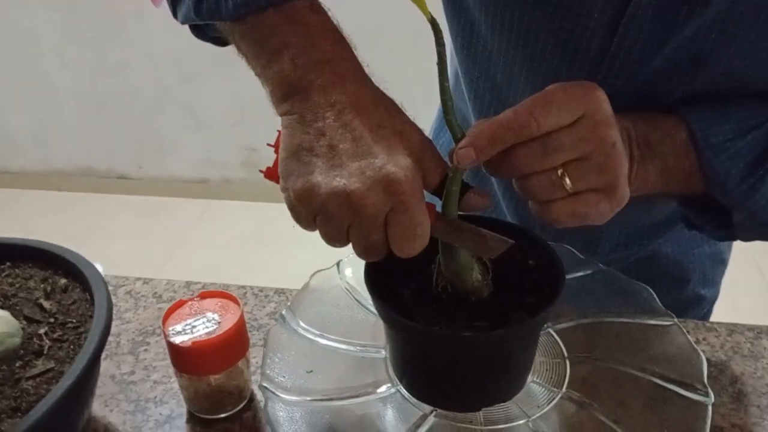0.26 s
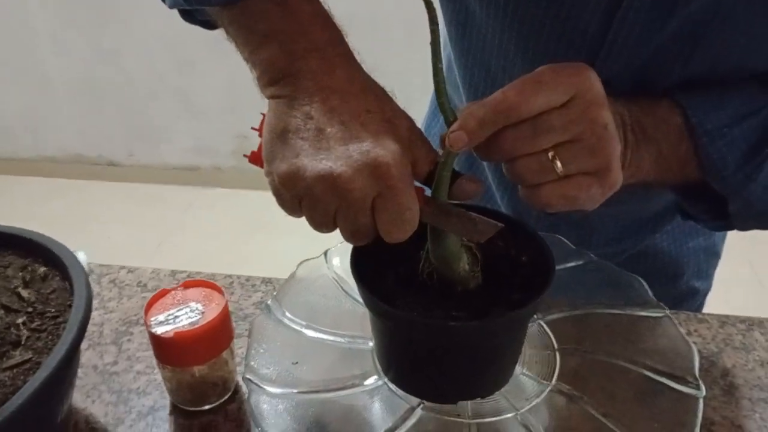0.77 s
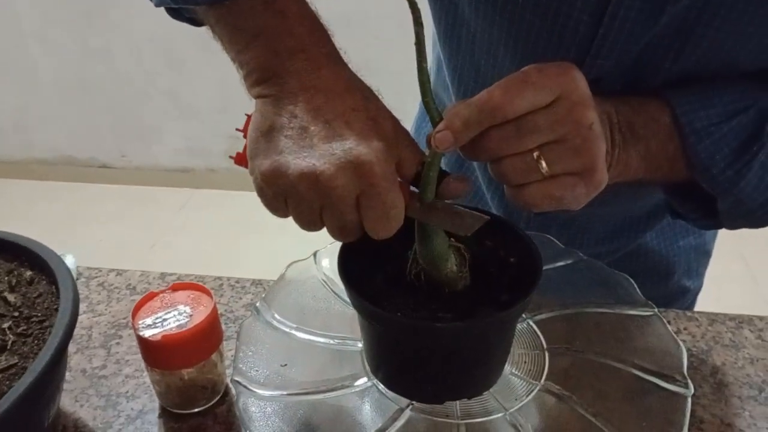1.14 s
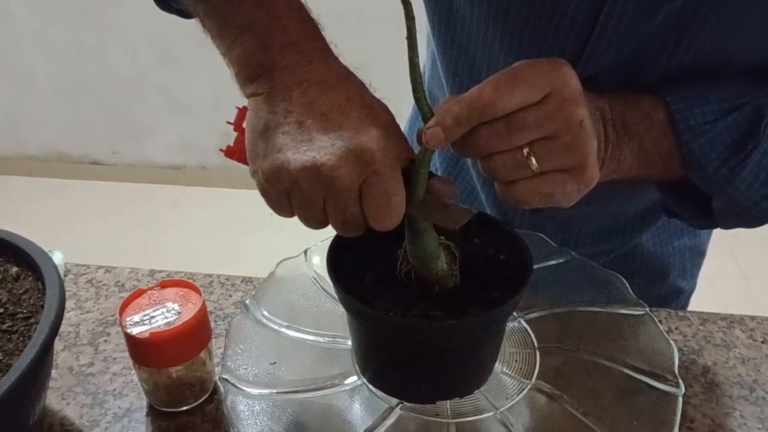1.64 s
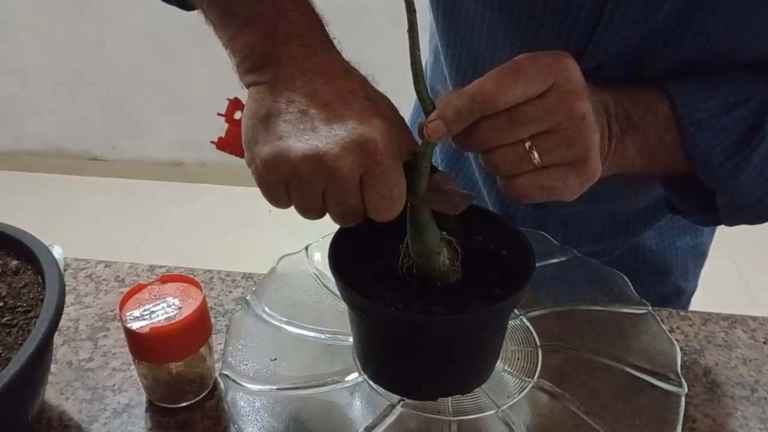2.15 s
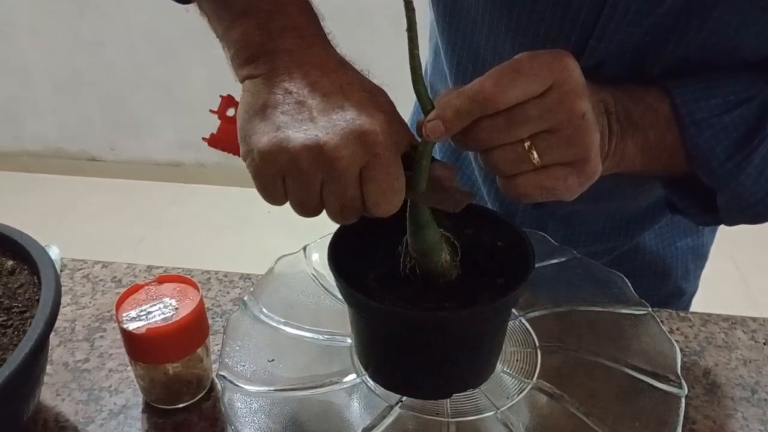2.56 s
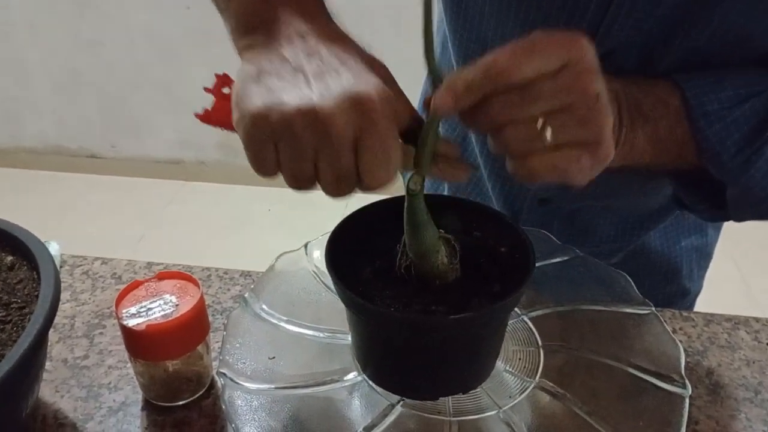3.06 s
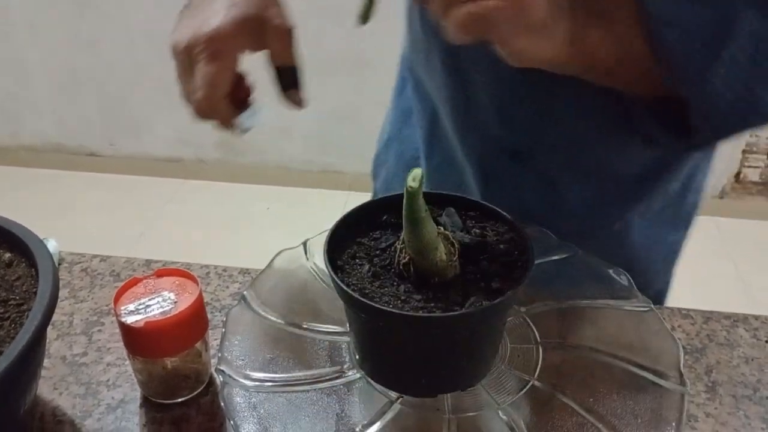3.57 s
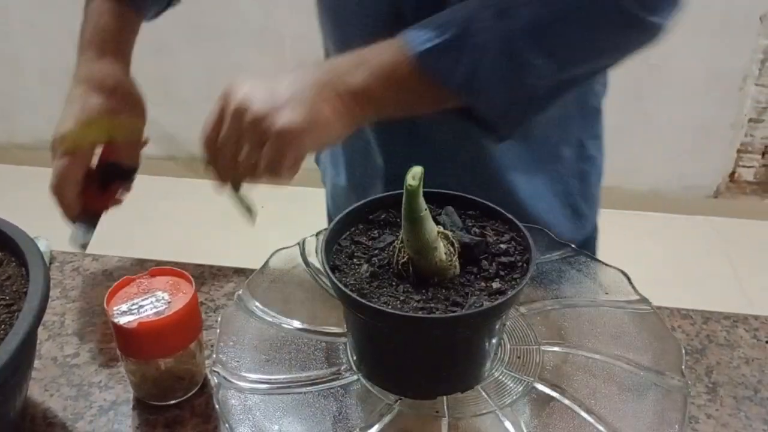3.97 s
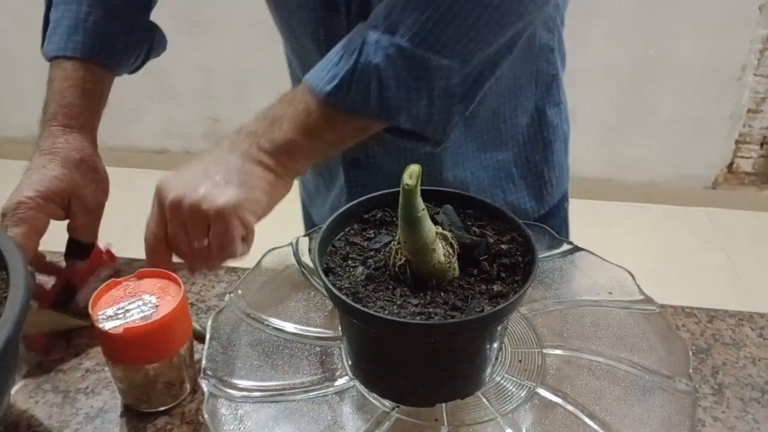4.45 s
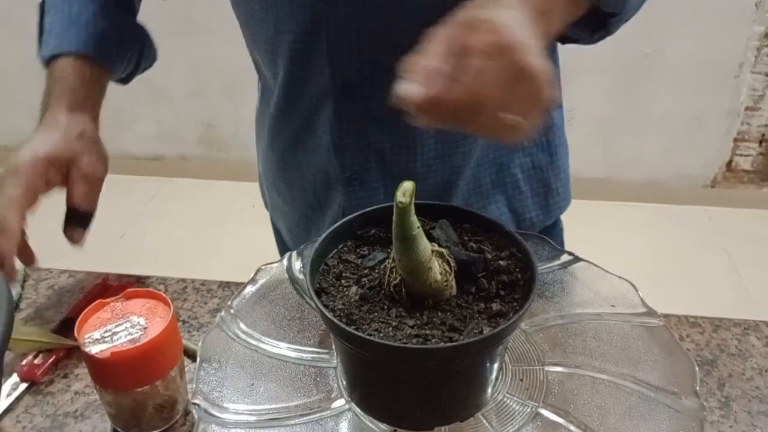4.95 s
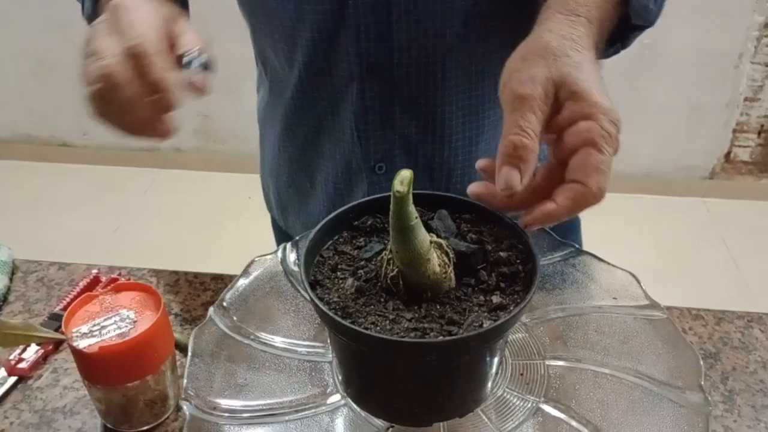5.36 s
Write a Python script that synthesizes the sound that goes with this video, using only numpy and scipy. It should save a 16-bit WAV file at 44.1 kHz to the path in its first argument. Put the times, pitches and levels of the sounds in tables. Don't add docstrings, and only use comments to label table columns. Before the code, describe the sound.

Close, sparse, dry clicks and short tears of a plant stem being cut, with faint squeaks and skin rubs, over low hum and soft hiss. Near three seconds the pot rocks with a soft low thud. Sleeves rustle, then a knife drops on stone in a fast, loud, metallic clatter with a rattling blade. The hard porch echoes briefly; small clicks and rubbing follow. Phone-like close pickup.

```python
import sys
import numpy as np
from scipy import signal
from scipy.fft import rfft, irfft, next_fast_len
from scipy.io import wavfile
from scipy.ndimage import uniform_filter1d, map_coordinates

SR = 44100
rng = np.random.default_rng(int(sys.argv[2]) if len(sys.argv) > 2 else 0)


def dump(signal):
    limited = np.clip(np.atleast_2d(signal).T, -1, 1)
    pcm = np.round(limited * 32767).astype(np.int16)
    wavfile.write(sys.argv[1], SR, pcm)


def amplitude_ratio(level_db):
    exponent = np.asarray(level_db, float) / 20
    return 10 ** exponent


N = 247576
TIME_S = np.arange(N) / SR


def unit(x):
    return x / np.sqrt(np.mean(x ** 2) + 1e-20)


def along(points, hz):
    f, v = np.transpose(points)
    return np.interp(np.log(hz + 1), np.log(f + 1), v)


def filtered(x, response):
    m = next_fast_len(len(x) + 8192)
    return irfft(rfft(x, m) * response(np.fft.rfftfreq(m, 1 / SR)), m)[:len(x)]


def coloured(x, spectrum):
    return filtered(x, lambda hz: amplitude_ratio(along(spectrum, hz)))


def modes(rows):
    def response(f):
        total = 0
        for k, (centre, width, db) in enumerate(rows):
            resonance = 1j * f * width / (centre * centre - f * f + 1j * f * width)
            total = total + (-1) ** k * amplitude_ratio(db) * resonance
        return total
    return response


def noise(spectrum, patchy_db):
    z = signal.stft(rng.standard_normal(N + 512), nperseg=512)[2]
    field = uniform_filter1d(rng.standard_normal(z.shape), size=6, axis=0)
    field = uniform_filter1d(field, size=10, axis=1)
    x = signal.istft(z * amplitude_ratio(patchy_db * unit(field)), nperseg=512)[1][:N]
    return unit(coloured(x, spectrum))


def wander(rate_hz, count):
    return map_coordinates(rng.standard_normal(count), [TIME_S * rate_hz])


def swells(rows):
    total = 0
    for start_s, length_s, *db in rows:
        arch = np.sin(np.pi * np.clip((TIME_S - start_s) / length_s, 0, 1))
        total = total + amplitude_ratio(np.array(db))[:, None] * arch
    return total


def contacts(rows, colour, body, sharp, hold, broad_db, knock_db):
    out, t = np.zeros(N + SR), np.arange(SR // 8) / SR
    for start_s, db, low_db, hz, rise_s, length_s in rows:
        push = amplitude_ratio(-60 * (t / length_s) ** hold) * (1 - np.exp(-t / rise_s))
        burst = push * rng.standard_normal(len(t))
        peak = filtered(burst, modes([(hz, hz / sharp, 0)]))
        broad = filtered(burst, lambda f: modes(colour)(f) / (1 + 1j * f / (1.95 * hz)) ** 2)
        bright = peak + amplitude_ratio(broad_db) * broad
        knock = filtered(burst + 2.0 * push ** 6, modes(body))
        bright = bright / np.abs(bright).max()
        knock = knock / np.abs(knock).max()
        out[round(start_s * SR):][:len(t)] += amplitude_ratio(db) * (bright + amplitude_ratio(low_db + knock_db) * knock)
    return out[:N]


# time in seconds, shaft speed in Hz, level in dB.
ENGINE_SPEED = [(0, 47.97, -70.5), (.7, 48.08, -69), (1.2, 45.86, -67), (2.05, 50.4, -66),
                (2.3, 46.36, -63), (2.9, 47.28, -59.5), (3.4, 47.33, -67.5), (3.85, 48.1, -63.5),
                (4.2, 49.6, -59.5), (4.55, 51.6, -65), (5, 50.04, -75), (5.2, 45.1, -81.5),
                (5.6, 43.7, -57)]
# multiple of shaft speed, level in dB.
SHAFT_ORDERS = [(2, -6.5), (3, -3), (4, 2.5), (5, -2.5), (6, -12.5)]


def engine():
    s, shaft_hz, level_db = np.transpose(ENGINE_SPEED)
    turns = np.cumsum(np.interp(TIME_S, s, shaft_hz)) / SR
    total = 0
    for order, db in SHAFT_ORDERS:
        waver = amplitude_ratio(2.1 * wander(6, 64))
        total = total + amplitude_ratio(db) * waver * np.sin(2 * np.pi * round(order) * turns)
    return amplitude_ratio(np.interp(TIME_S, s, level_db) - 0.5) * total


# frequency in Hz, density in dB per Hz.
AIR_SPECTRUM = [(20, -49), (40, -38), (52, -26), (75, -9.5), (102, -3.5), (185, -6.5), (394, -15.5),
                (641, -17.5), (988, -21.5), (1480, -25), (2400, -26), (3200, -32.5), (5880, -33),
                (16000, -34.5)]
# start in seconds, length in seconds, level in dB.
TRUCK_PASSES = [
    (.2, 0.97, -77),
    (2.2, .3, -67),
    (2.8, 0.26, -64),
    (4.7, 0.78, -62.5),
]


def outdoors():
    air_db, mains_db, mains_hz = -58, -71.5, 60
    beat_hz, beat_at_s, beat_share = 0.86, 1.25, 0.54

    def hum(hz, width_hz):
        return unit(filtered(rng.standard_normal(N), lambda f: modes([(hz, width_hz, 0)])(f) ** 2))

    air = amplitude_ratio(air_db - 0.5) * noise(AIR_SPECTRUM, patchy_db=1.22)
    beat = 1 + beat_share * np.cos(2 * np.pi * beat_hz * (TIME_S - beat_at_s))
    mains = beat * (np.sin(2 * np.pi * mains_hz * TIME_S) + 0.3 * hum(61, 6.9))
    traffic = (amplitude_ratio(-71) + swells(TRUCK_PASSES)[0]) * hum(123.0, 59.4)
    return air + amplitude_ratio(mains_db) * mains + traffic + engine()


# start in seconds, peak in dB, pitch in Hz, length in seconds.
SQUEAK_EVENTS = [(1.282, -62, 3880, 0.062), (1.248, -54, 7900, .015), (2.785, -61, 10800, 0.067),
                 (3.068, -55.5, 4690, 0.015), (3.092, -61, 7570, .045), (3.615, -61, 4550, 0.046),
                 (4.087, -47, 4500, 0.01), (5.065, -57, 13760, .015), (5.399, -60, 5170, .041),
                 (5.42, -51.5, 4860, 0.054), (5.42, -57.5, 6770, .046)]


def squeaks():
    rise_share, waver_rad = 0.15, 1
    out, t = np.zeros(N + SR), np.arange(SR // 8) / SR
    for start_s, db, hz, length_s in SQUEAK_EVENTS:
        shape = amplitude_ratio(-60 * (t / length_s) ** 2.04) * (1 - np.exp(-t / (rise_share * length_s)))
        waver = waver_rad * map_coordinates(rng.standard_normal(128), [t * 600])
        out[round(start_s * SR):][:len(t)] += amplitude_ratio(db) * shape * np.sin(2 * np.pi * hz * t + waver)
    return out[:N]


# start in seconds, peak in dB, stem knock in dB, bright pitch in Hz.
FIBRE_SNAPS = [(0.541, -44.5, -22, 4350), (0.571, -62.5, -5.5, 10400), (0.643, -63, -8, 5270),
               (0.6897, -34, -35, 10000), (0.8129, -52.5, -19, 6600), (0.886, -30, -18.5, 11730),
               (0.8865, -37, -40, 6500), (1.1488, -53, -18, 10700), (1.2254, -51, -17, 4800),
               (1.3075, -50, -20, 9780), (1.481, -56, -25, 6600), (1.6104, -33.5, -44, 9350),
               (1.6106, -37, -48, 4800), (2.628, -55, -24, 7900), (2.8484, -59, -16, 10800),
               (2.859, -32.5, -31, 11000), (3.246, -54, -31, 5254), (3.492, -47, -25, 8500),
               (4.1973, -46, -26, 9700), (4.374, -52, -18, 9000), (4.926, -49, -23, 7640),
               (5.265, -55, -27, 4700), (5.552, -56, -18.5, 4800)]
# start in seconds, peak in dB, stem knock in dB,
# bright pitch in Hz, length in seconds.
FIBRE_TEARS = [(1.028, -34.5, -18.5, 9000, 0.0088), (1.232, -49, -32, 7900, .015),
               (1.613, -41, -24, 11000, 0.013), (1.656, -44, -19.5, 9700, 0.013),
               (1.728, -52, -22, 11000, .028), (1.839, -46.5, -22, 10900, 0.013),
               (2.0555, -47.5, -32, 9000, 0.01), (2.185, -49.5, -27, 10920, .016),
               (2.739, -38, -22.5, 11210, 0.012), (2.885, -42.5, -12.5, 11400, 0.0042),
               (3.1, -56, -25, 11000, .022), (3.06, -58, -7, 7700, 0.01), (5.423, -55, -26.5, 12000, 0.031),
               (5.509, -63, 2, 4760, 0.031)]
# frequency in Hz, width in Hz, level in dB.
FIBRE_COLOUR = [(4300, 870, -8.5), (7760, 1030, 0.5), (11070, 1030, 0.5), (14800, 1600, 1)]
# frequency in Hz, width in Hz, level in dB.
STEM_MODES = [(450, 110, -2.5), (794, 280, -12), (1412, 160, -1.5), (2576, 69, -6)]


def stem():
    rise_s, snap_s, tear_rise_share = 0.00027, 0.0091, 0.11
    snaps = []
    for start_s, db, low_db, hz in FIBRE_SNAPS:
        length_s = snap_s * (1 + amplitude_ratio(0.12 * 4.8 * (db + low_db + 50)))
        snaps.append((start_s, db, low_db, hz, rise_s, length_s))
    tears = [(*row, tear_rise_share * length_s, length_s) for *row, length_s in FIBRE_TEARS]
    cracking = contacts(snaps, FIBRE_COLOUR, STEM_MODES, sharp=15.0, hold=0.7, broad_db=-7.5, knock_db=12.5)
    tearing = contacts(tears, FIBRE_COLOUR, STEM_MODES, sharp=12.4, hold=3.8, broad_db=5.5, knock_db=9.5)
    return cracking + tearing + squeaks()


# start in seconds, level in dB, length in seconds.
INSECT_CHIRPS = [
    (1.074, -71, 0.033),
    (1.777, -64.5, 0.04),
    (1.858, -69, 0.047),
    (2.15, -75, 0.13),
    (2.39, -77, 0.16),
    (3.049, -72, 0.043),
    (4.002, -72.5, 0.13),
    (4.18, -73, 0.13),
    (5.18, -71, .05),
]


def insect():
    pitch_hz, rise_s, fall_s = 2259, 0.0053, 0.07
    shape = 0
    for start_s, db, length_s in INSECT_CHIRPS:
        age_s = TIME_S - start_s
        fall = amplitude_ratio(-40 * np.clip(age_s - length_s, 0, 1) / fall_s)
        shape = shape + amplitude_ratio(db) * np.clip(age_s / rise_s, 0, 1) * fall
    loudness = amplitude_ratio(0.5 + 1.7 * wander(60, 400))
    return shape * loudness * np.sin(2 * np.pi * pitch_hz * TIME_S + 0.79 * wander(60, 400))


# start in seconds, length in seconds, fizz in dB, body in dB.
HAND_MOVES = [(1.225, 0.058, -65, -62), (1.27, 0.07, -64.5, -65), (2.78, 0.062, -74, -82),
              (2.86, 0.07, -67, -66), (3.05, 0.085, -71, -72), (3.38, 0.13, -66, -70),
              (3.55, 0.58, -66, -65.5), (3.71, 0.11, -95, -64), (4.0, 0.45, -65.5, -65.5),
              (5.0, 0.17, -68.5, -62.5), (5.2, 0.4, -74.5, -67.5), (5.48, 0.17, -73, -62)]
# frequency in Hz, density in dB per Hz.
SKIN_FIZZ = [(2500, -13), (4500, -3.5), (6000, -6.5), (8500, -3.5), (12000, -7.5), (16000, -19)]
# frequency in Hz, density in dB per Hz.
SLEEVE_CLOTH = [(250, -6), (500, 4.5), (1000, -7), (2200, -4.5), (3200, -31)]


def hands():
    fizz, body = swells(HAND_MOVES)
    grain = unit(amplitude_ratio(1.45 * unit(uniform_filter1d(rng.standard_normal(N), size=120))))
    return fizz * grain * noise(SKIN_FIZZ, patchy_db=0.3) + body * noise(SLEEVE_CLOTH, patchy_db=3.5)


# frequency in Hz, level in dB, t60 in seconds.
POT_MODES = [(111, -41, 0.18), (181, -37, .12), (1213, -56, 0.12), (1570, -58, 0.24)]


def thud():
    t = np.clip(TIME_S - 2.928, 0, None)
    total = 0
    for hz, db, t60_s in POT_MODES:
        total = total + amplitude_ratio(db - 60 * t / t60_s) * np.sin(2 * np.pi * hz * t)
    return total * (1 - np.exp(-t / 0.0088))


# start in seconds, level in dB, pitch in Hz, t60 in seconds.
BUTT_HITS = [
    (4.385, -56, 934, .06),
    (4.4155, -41, 909, 0.1),
    (4.468, -43, 1093, 0.16),
]


def butt():
    total = 0
    for start_s, db, hz, t60_s in BUTT_HITS:
        age_s = TIME_S - start_s
        shape = amplitude_ratio(db - 60 * np.clip(age_s, 0, 9) / t60_s) * np.clip(age_s / 0.0011, 0, 1)
        total = total + shape * np.sin(2 * np.pi * hz * TIME_S)
    return total


# start in seconds, level in dB, hold in seconds, t60 in seconds.
BLADE_SHAKES = [
    (4.414, -31.5, .008, .08),
    (4.472, -27, .006, 0.37),
    (4.58, -28.5, 0.021, 0.36),
    (4.672, -36.5, .02, 0.048),
]
# frequency in Hz, density in dB per Hz.
CHATTER_SPECTRUM = [(150, -44.5), (400, -11), (1000, -21.5), (2000, -10), (3500, -12.5), (6500, -4.5),
                    (9500, -2.5), (13000, -6.5), (16000, -3)]


def rattle():
    blows = rng.standard_normal(N) * amplitude_ratio(6.7 * rng.random(N)) * (rng.random(N) < 0.18)
    blows = blows * amplitude_ratio(2.2 * wander(250, 2000))
    shake = 0
    for start_s, db, hold_s, t60_s in BLADE_SHAKES:
        age_s = TIME_S - start_s
        decay = amplitude_ratio(db - 60 * np.clip(age_s - hold_s, 0, 1) / t60_s)
        shake = shake + decay * np.clip(age_s / 0.0086, 0, 1)
    return unit(coloured(blows, CHATTER_SPECTRUM)) * shake


# start in seconds, peak in dB, bright pitch in Hz, length in seconds.
STONE_BOUNCES = [(4.4172, -24, 9870, .03), (4.4181, -14, 7180, 0.063), (4.4671, -9, 4080, 0.031),
                 (4.4684, -12, 11740, 0.042), (4.499, -15, 6500, 0.073), (4.526, -22, 3290, 0.05),
                 (4.529, -14.5, 7250, .06), (4.5613, -11.5, 13800, .018), (4.5649, -10.5, 10200, .03),
                 (4.5874, -15, 9130, 0.045), (4.612, -15, 8900, 0.11), (4.6419, -21, 5270, 0.02),
                 (4.6434, -20, 14140, 0.027), (4.645, -15, 6500, 0.029), (4.67, -22.5, 6330, 0.047)]
# frequency in Hz, width in Hz, level in dB.
STONE_COLOUR = [(3300, 1280, -4.5), (6500, 10200, -1), (9640, 5300, 3), (14400, 3000, -21)]
# frequency in Hz, width in Hz, level in dB.
HANDLE_MODES = [(245, 230, -9.5), (500, 196, -0.5), (1030, 410, -1.5), (1410, 340, -1), (2150, 1400, -7.5)]
# frequency in Hz, width in Hz, level before and level after tipping over in dB.
BLADE_MODES = [(687, 8.9, -13, 17.5), (902, 32, 8, -7), (1827, 62, 6, -9), (2597, 90, 1.5, 9.5),
               (3220, 150, 1.5, -22.5), (5020, 50, -2.5, 6), (5150, 64, 0, 8.5), (6290, 48, 6.5, -24.5),
               (6470, 88, -6, 0.5), (6930, 90, -7, 7), (7700, 26, -13.5, 1), (8970, 80, -2.5, 6.5),
               (9960, 120, 3, -12), (10400, 120, -6.5, 4.5)]


def knife():
    tip_over_s, hard_rise_s = 4.578, 0.0006
    handle_db, handle_grows, handle_fade_db_per_s = -38.5, 0.43, 33
    rows = []
    for start_s, db, hz, length_s in STONE_BOUNCES:
        fade_db = handle_fade_db_per_s * abs(start_s - STONE_BOUNCES[2][0])
        knock_db = handle_db + (handle_grows - 1) * db - fade_db
        rise_s = hard_rise_s
        if start_s > STONE_BOUNCES[3][0]:
            rise_s = hard_rise_s * (length_s / 0.041) ** 1.9
        rows.append((start_s, db, knock_db, hz, rise_s, length_s))
    blows = contacts(rows, STONE_COLOUR, HANDLE_MODES, sharp=16.3, hold=0.94, broad_db=-5.5, knock_db=9.5)
    chatter = rattle()
    drive, late = blows + amplitude_ratio(4.0) * chatter, TIME_S > tip_over_s
    hz, width, before_db, after_db = np.transpose(BLADE_MODES)
    ringing = filtered(drive * ~late, modes(list(zip(hz, width, before_db))))
    ringing = ringing + filtered(drive * late, modes(list(zip(hz, width, after_db))))
    handle = filtered(chatter, modes(HANDLE_MODES))
    return blows + amplitude_ratio(0.5) * chatter + amplitude_ratio(-1.0) * ringing + amplitude_ratio(-13) * handle


# frequency in Hz, t60 in seconds.
PORCH_DECAY = [(300, 1), (1500, 0.79), (5000, 0.6), (8000, 0.54), (12000, 0.36), (16000, 0.17)]


def porch(x):
    hz, t, z = signal.stft(rng.standard_normal(SR), SR, nperseg=256)
    decay = amplitude_ratio(-60 * t / along(PORCH_DECAY, hz)[:, None])
    tail = signal.istft(z * decay * np.clip(t / 0.024, 0, 1), SR, nperseg=256)[1]
    return signal.fftconvolve(np.pad(x, (200, 0)), tail / np.linalg.norm(tail))[:N]


def scene():
    cut, drop = stem(), knife() + butt()
    echo = porch(amplitude_ratio(-16.5) * cut + amplitude_ratio(-6.5) * drop)
    return (cut + drop + echo + hands() + thud() + insect() + outdoors())[None]


def low_pass(x):
    return signal.sosfilt(signal.butter(12, 16650, fs=SR, output="sos"), x)


# frequency in Hz, gain in dB.
BAND_LIMIT = [(15000, -1), (15700, -0.5), (15950, -24), (16600, -50), (16700, -100)]


def record(dry):
    mix = coloured(dry[0], BAND_LIMIT)[None]
    return low_pass(mix)


dry = scene()
out = record(dry)
dump(out)
```